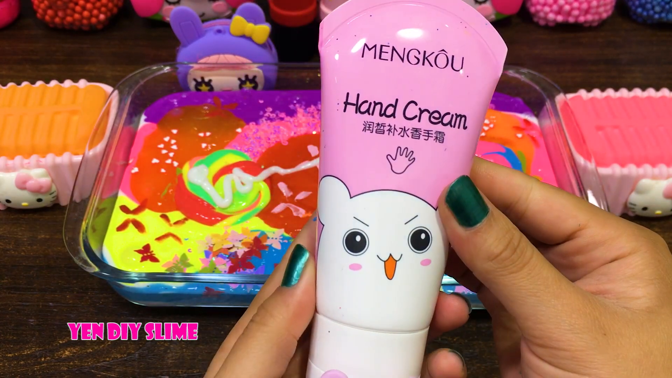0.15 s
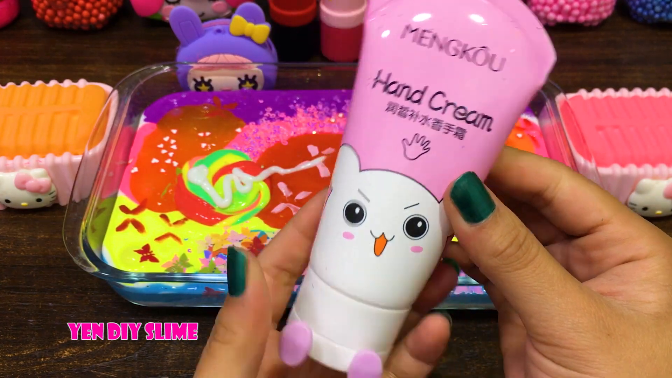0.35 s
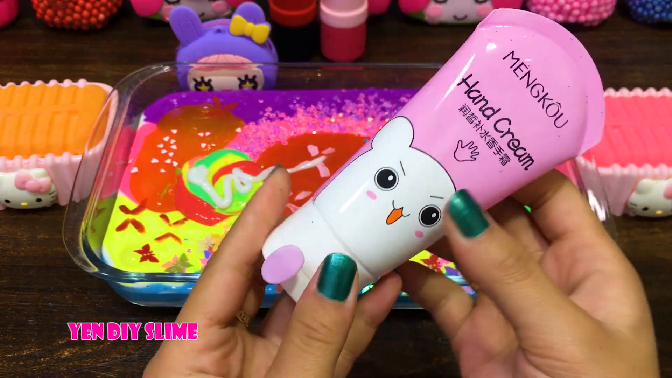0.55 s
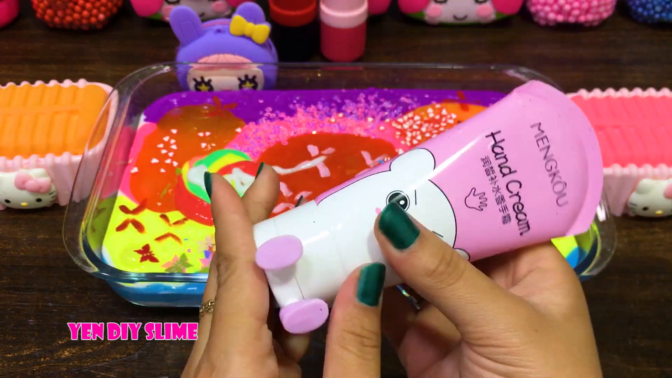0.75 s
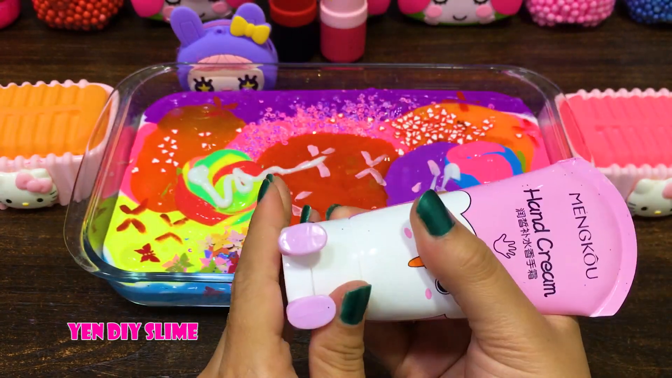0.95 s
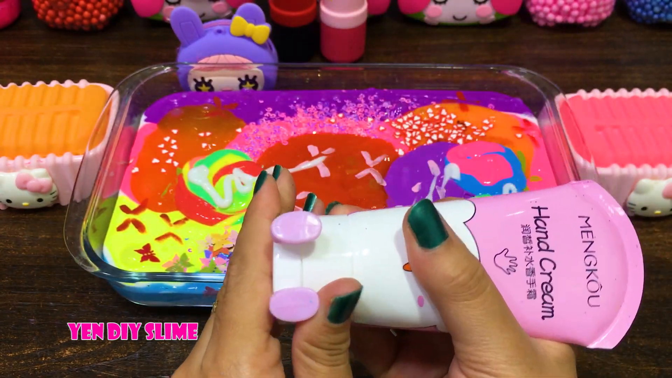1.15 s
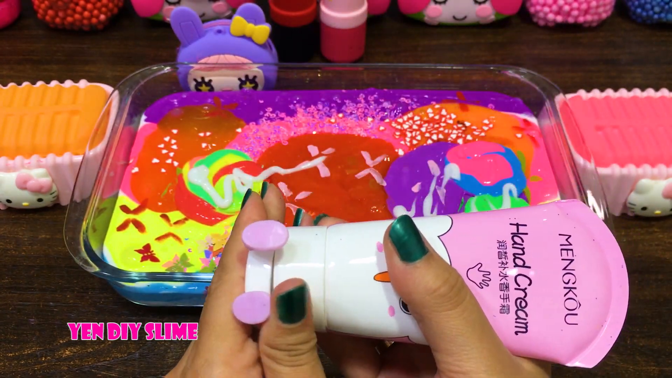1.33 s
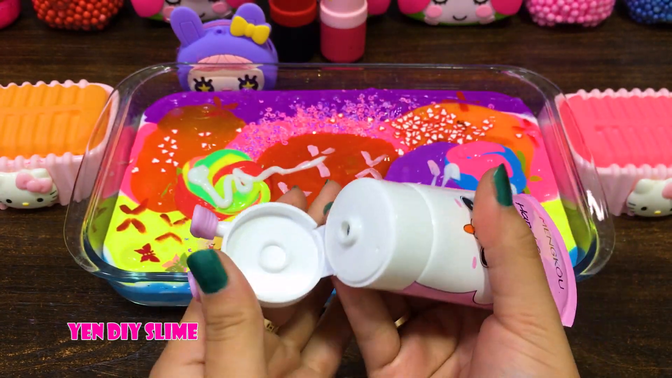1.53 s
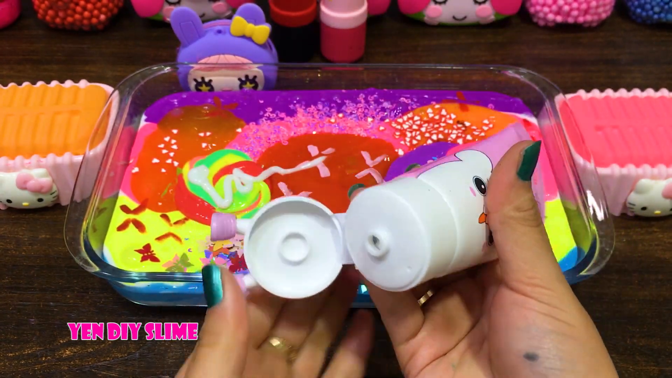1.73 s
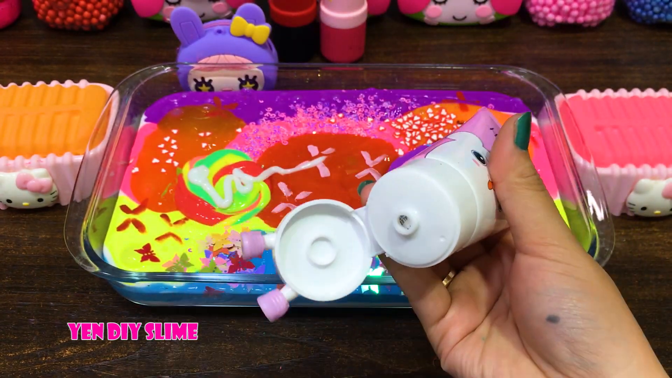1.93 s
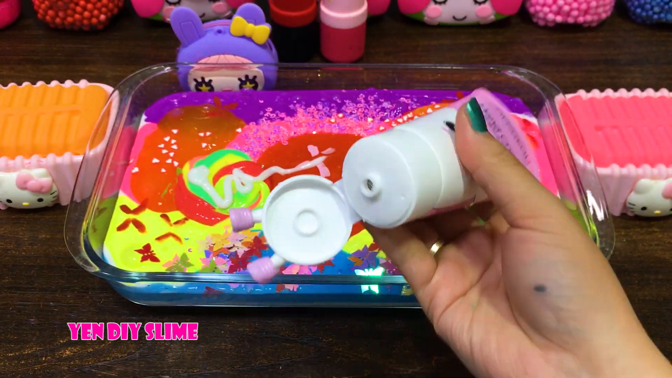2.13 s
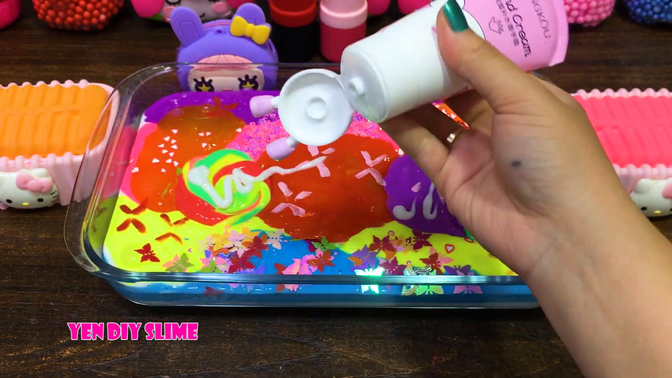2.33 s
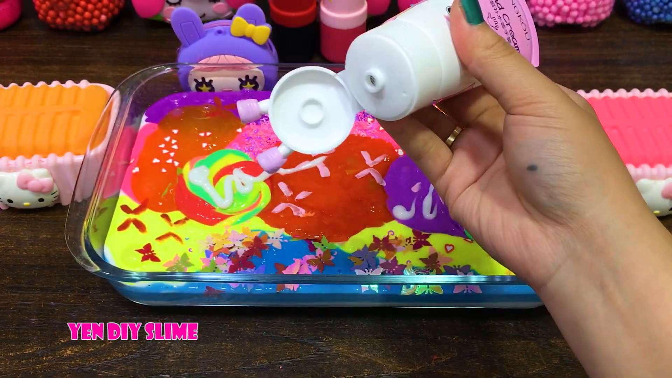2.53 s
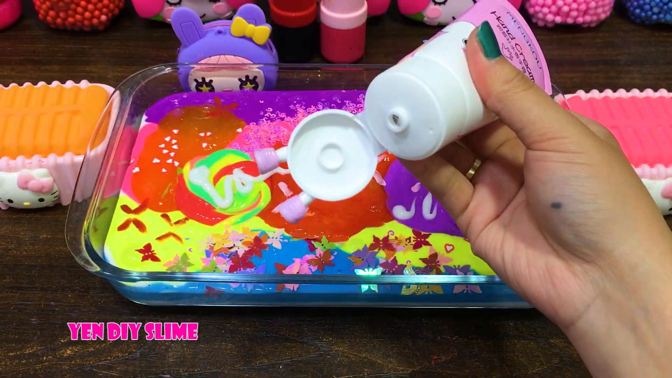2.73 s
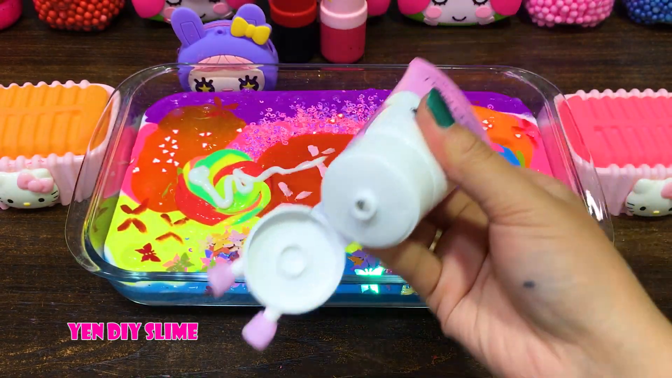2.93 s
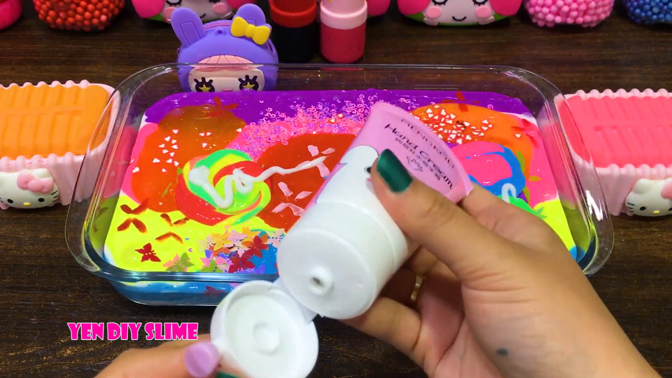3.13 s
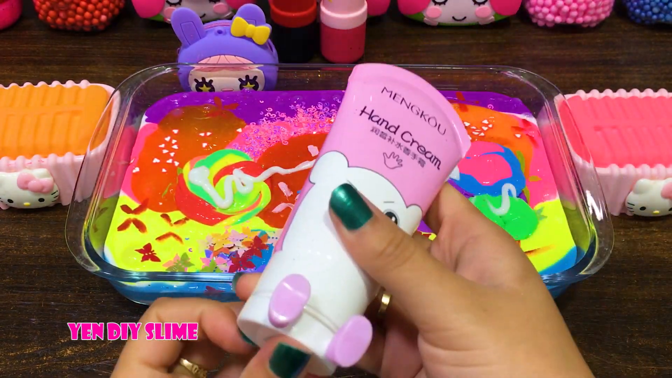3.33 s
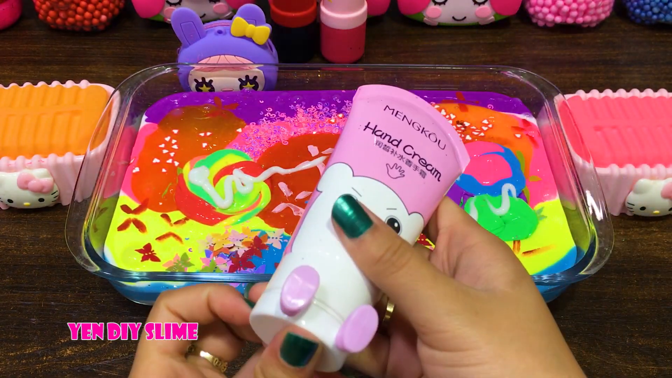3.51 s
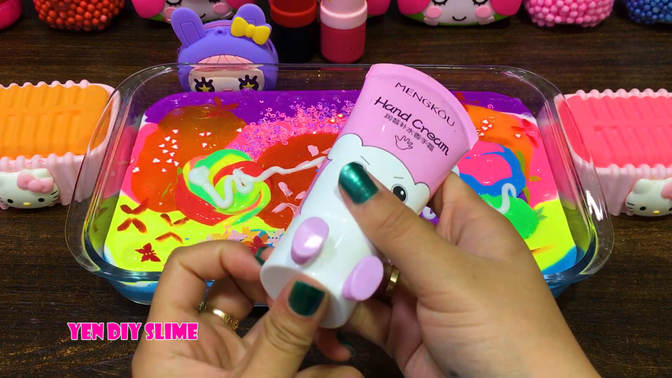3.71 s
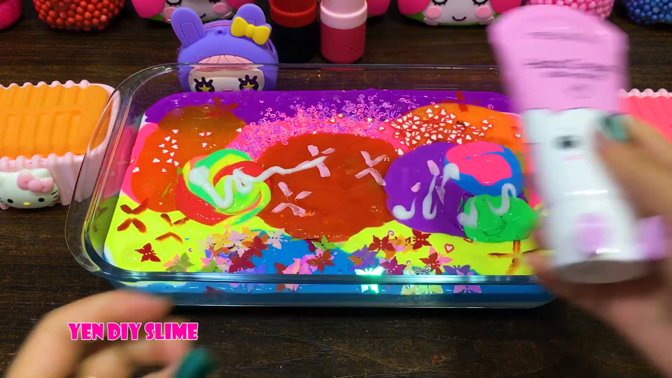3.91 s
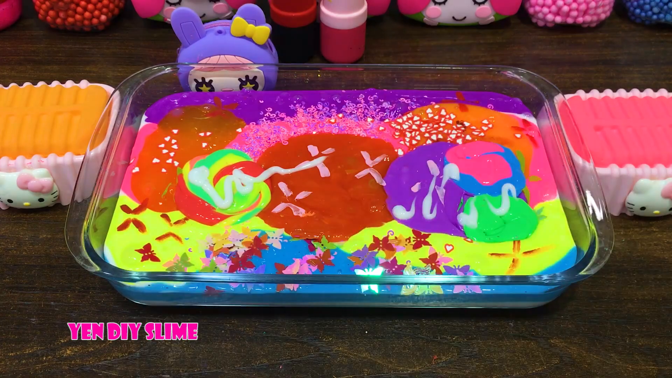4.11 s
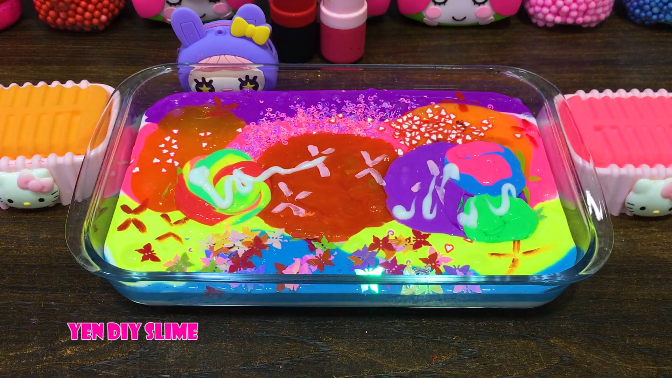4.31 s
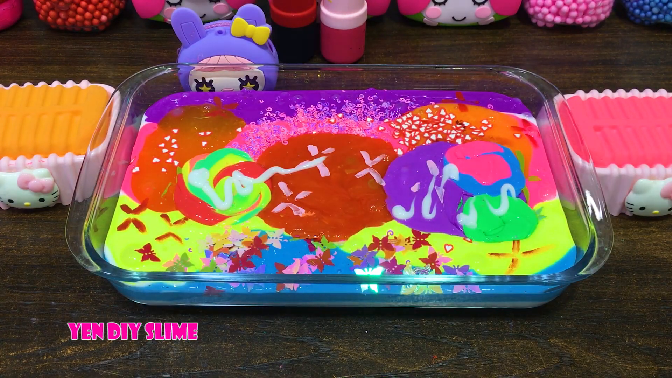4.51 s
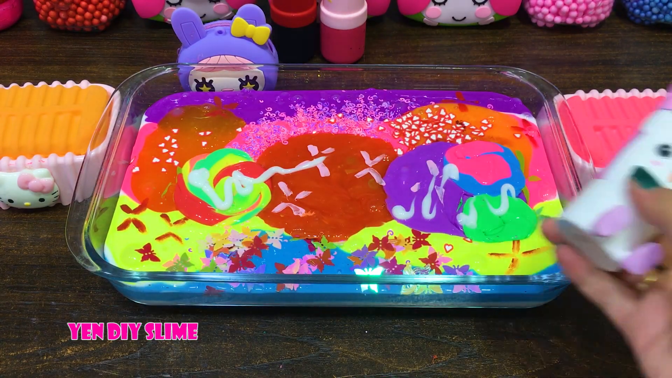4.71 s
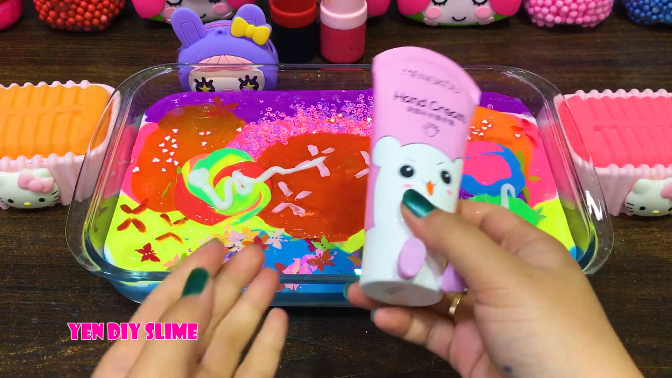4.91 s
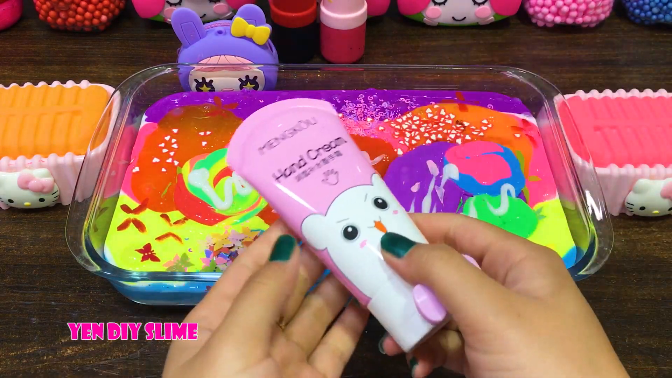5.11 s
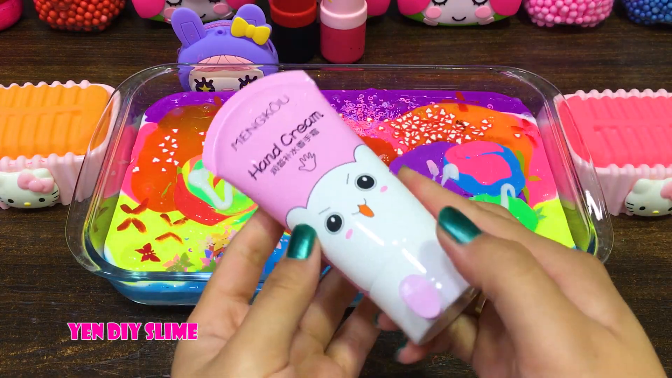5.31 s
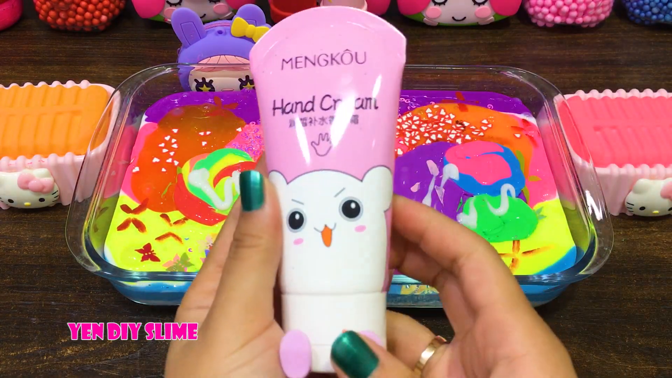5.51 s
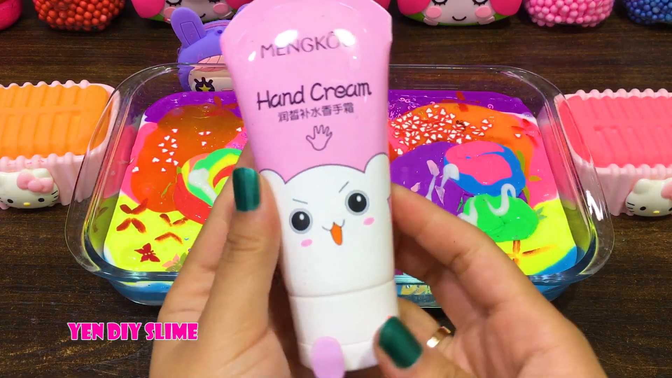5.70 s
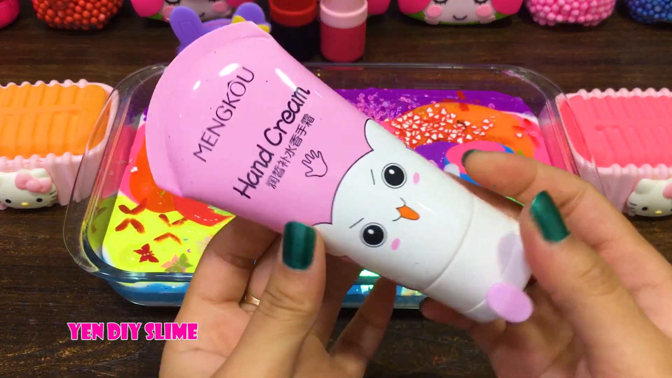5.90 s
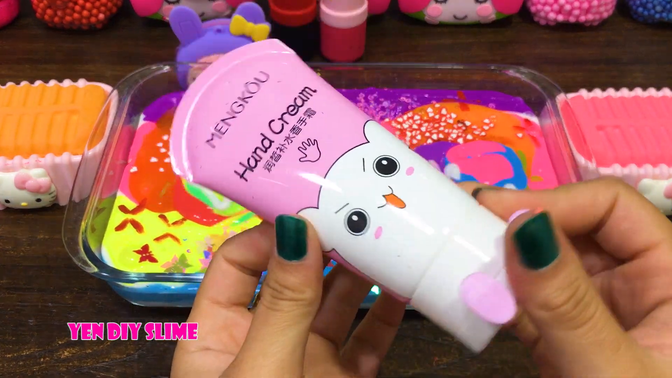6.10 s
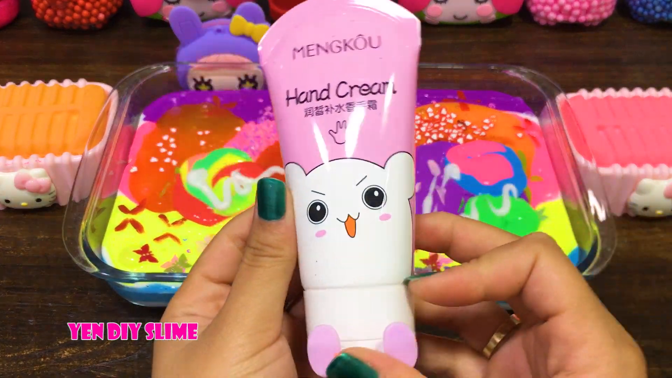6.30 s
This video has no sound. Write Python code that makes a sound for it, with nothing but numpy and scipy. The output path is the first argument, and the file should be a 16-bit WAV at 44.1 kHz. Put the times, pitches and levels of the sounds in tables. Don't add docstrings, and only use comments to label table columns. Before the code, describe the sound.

Very close to the microphone, fingers softly rub and tap a small hollow plastic tube. A nail pries the flip cap, which pops open, and its hinge creaks in a quick crackle. After a quieter stretch the cap touches down, strains and latches with a sharp snap, then clicks fully shut. Light rubs and ticks continue over faint hiss and low hum in a small damped room.

```python
import sys
import numpy as np
from scipy import signal
from scipy.fft import rfft, irfft
from scipy.io import wavfile

SR = 44100
rng = np.random.default_rng(int(sys.argv[2]) if len(sys.argv) > 2 else 0)


def output_pcm(signal):
    pcm = np.clip(np.atleast_2d(signal).T, -1, 1) * 32767
    wavfile.write(sys.argv[1], SR, np.round(pcm).astype(np.int16))


def invert_db(x):
    u = np.asarray(x, float) / 20
    return 10 ** u


N = 280035

# f/Hz, density/dB
RUMBLE_SPECTRUM = [(15, -45), (25, -15), (38, -3), (59, 5), (167, -1.5), (310, -4), (546, -14),
                   (1310, -26.5), (1500, -30), (1950, -48), (3300, -120)]
# t/s, level/dB
RUMBLE_LEVEL = [(0.0, -72), (1.48, -73), (1.73, -70), (2.05, -73.5), (4.86, -70.5), (5.48, -72.5),
                (6.01, -70), (6.35, -72.5)]
# f/Hz, density/dB
HISS_SPECTRUM = [(300, 6.5), (1000, 1.5), (2500, 0), (3700, -4.5), (5000, -2), (6400, -5.5), (8000, -2),
                 (10000, -6.5), (12000, -4), (13500, -9.5), (15000, -4.5), (16400, -10.5)]
# f/Hz, width/Hz
ROOM_MODES = [(79, 12.2), (137, 3.3)]
ROOM_MODE_LEVELS = [-79.5, -82]
# t/s, length/s, level/dB, f/Hz
HUMS = [
    (0.05, .42, -69, 55),
    (0.88, .52, -70, 55),
    (4.15, .3, -73, 82),
    (4.7, .65, -69, 80),
    (4.65, .6, -75, 137),
    (5.5, .24, -57, 76),
    (5.7, .8, -63.5, 80),
    (5.47, 1.0, -65.5, 137),
    (5.6, .7, -77, 190),
]
# f/Hz, T60/s
ROOM_T60 = [(150, .22), (500, .2), (1500, .2), (5000, .225), (8000, .19), (12000, .15), (16000, .11)]
# f/Hz, level/dB
ROOM_SPECTRUM = [(150, 3.5), (500, 0), (1500, -3), (4000, -4.5), (8000, -4.5), (12000, -2.5), (16000, -6)]
# t/s, peak/dB, f/Hz
THUMPS = [(1.545, -39, 116), (1.548, -35, 335), (3.224, -37, 250), (3.239, -49, 89.34), (3.265, -50.5, 198),
          (3.851, -41, 151.6), (5.56, -59, 76), (0.26, -51, 216), (0.745, -56, 292), (0.773, -52.5, 295),
          (1.0, -53.5, 220), (1.552, -25.5, 950), (3.272, -48, 300), (3.451, -37, 260),
          (3.8525, -28.5, 270)]
# peak t/s, length/s, level/dB, spectral centre/octaves above 1 kHz
STROKES = [(0.06, .12, -78, 2.3), (0.588, 0.055, -71, 3.1), (0.91, 0.18, -65, 2.7),
           (0.942, 0.049, -62.5, 0.86), (1.014, 0.066, -62, 0.89), (1.048, 0.18, -60.5, 2.85),
           (1.29, 0.023, -64, 2.1), (1.908, 0.058, -64, 0.41), (2.04, 0.58, -68.5, 1.03),
           (2.433, 0.45, -69, 1.3), (2.995, 0.031, -61.5, 2.8), (3.166, 0.11, -66, 3.2),
           (3.404, 0.055, -70, 1.2), (4.068, 0.11, -64.5, 2.9), (4.173, 0.21, -65.5, 0.93),
           (4.274, 0.12, -62, 2.2), (5.198, .18, -66, 0.93), (5.34, .08, -75, 2.2), (5.431, .12, -67, 1.5),
           (6.027, .14, -71, 0.65)]
# t/s, peak/dB, f/Hz
TICKS = [(0.055, -50.5, 930), (0.26, -54, 1100), (0.671, -45.5, 1130), (0.708, -45.5, 950),
         (0.931, -48.5, 1230), (1.0, -46, 1230), (2.379, -53, 1420), (3.104, -50.5, 1280),
         (4.547, -54.5, 2260), (4.865, -50.5, 2330), (4.999, -54, 2650), (5.177, -51, 2115),
         (5.963, -46.5, 1100), (5.9625, -52.5, 5000), (6.014, -54, 1711), (0.625, -48, 7850),
         (0.771, -49, 8900), (1.493, -55, 5500), (0.772, -49, 1040), (0.879, -53, 5660), (1.054, -38, 7000),
         (4.014, -48.5, 11700), (4.269, -55, 4790), (4.646, -55, 5790), (4.659, -54.5, 12350),
         (4.825, -52, 9140), (5.14, -57, 5130), (5.218, -54, 11900), (5.319, -59.5, 5450),
         (5.418, -54.5, 8350)]
# t/s, level/dB
HINGE_DRAG = [(1.709, -66), (1.735, -59), (1.758, -59), (1.764, -75), (1.80, -61), (1.83, -65), (1.86, -72)]
# t/s, slips/count, first gap/ms, gap growth/ratio, peak/dB
HINGE_RUNS = [
    (1.6665, 2, 5.3, 1, -53),
    (1.7111, 1, 5, 1, -37),
    (1.7174, 10, 4.0, 1.025, -47),
    (1.7659, 1, 5, 1, -42),
    (1.7746, 5, 5.2, 1, -39),
    (1.8021, 5, 8.7, 1.17, -39),
    (1.8905, 3, 4.5, 1.3, -53),
]
# t/s, peak/dB
LATCH_SLIPS = [(3.3764, -43), (3.4201, -47), (3.428, -43), (3.4309, -50), (3.4354, -49), (3.4459, -35)]
# start t/s, end t/s, level/dB, f/Hz, width/Hz
SQUEAK = (3.4, 3.446, -60, 5100, 400)

# f/Hz, width/Hz, level/dB
MODES_PRIED = [(350, 210, -12.5), (750, 120, -10), (1320, 190, -6), (2900, 230, -7.5), (8800, 2000, -13),
               (2030, 280, -7.0), (3600, 220, -5.0), (4210, 570, -7.5), (5060, 630, 2.5), (6800, 610, -2.0),
               (9500, 1300, -13), (11900, 580, -12), (13700, 540, -8.5), (15900, 510, -5.0)]
MODES_POPPING = [(800, 1300, -12.0), (2030, 280, -15.0), (7200, 400, -28.0), (356, 240, 7), (1360, 120, -4),
                 (2880, 1200, -1.5), (3570, 420, 3), (4790, 1230, 9.5), (6220, 700, -0.5), (8550, 630, 2.5),
                 (10840, 480, -5.0), (12320, 800, -7.5), (14300, 260, -45)]
MODES_HINGE = [(606, 870, -2.5), (950, 340, -9), (1287, 160, -2), (2260, 320, -6.5), (2770, 350, -1.5),
               (3710, 600, -18), (4540, 600, -7), (5680, 480, -1.5), (7033, 1800, -10.5), (9630, 700, -9.5),
               (11170, 1300, -20.5), (13990, 1400, -25)]
MODES_MEETING = [(290, 460, -11), (1227.6, 394, -11.5), (2140, 556, -8.5), (4305, 770, -4), (5480, 730, -1),
                 (7200, 690, -4.5), (8610, 560, -8), (9556, 680, -9), (10980, 474, -4.5),
                 (12380, 650, -20.5), (15170, 1040, -7)]
MODES_LATCHING = [(260, 150, -22), (420, 290, -21.5), (741.3, 350, -27), (5190, 160, -12.0),
                  (12800, 603, -15.5), (1200, 232.6, -7.5), (2660, 1000, -12.0), (4320, 274, -2),
                  (5610, 590, -2), (7800, 630, -11.5), (9170, 395, -13.5), (10680, 602.5, -11.0),
                  (11900, 1230, -13.0), (14870, 290, -33.5)]
MODES_SEALED = [(250, 200, -11.5), (610, 190, -20.5), (1110.0, 650, -12.0), (5750, 170, -21.0),
                (12850, 2400, -29), (1715, 450, -3.5), (3050, 250, -8), (4300, 660, -18.5),
                (5000, 410, -31.0), (6640, 240, -23.5), (7100, 346, -23.5), (8240, 380, -16.0),
                (10000, 338, -25.5), (11270, 700, -28.0), (14900, 2500, -24.5)]

# t/s, peak/dB, contact length/ms
PRY = [
    (1.1637, -29, .4),
    (1.1642, -24, .5),
    (1.1649, -25, .5),
    (1.1655, -26, .3),
]
POP = [
    (1.5441, -38, 1.5),
    (1.5472, -34, 1.2),
    (1.5479, -10, 1.2),
    (1.5505, -26.5, 0.4),
]
MEET = [
    (3.221, -40, 0.36),
    (3.2218, -24, 0.42),
    (3.2373, -15.5, 0.53),
    (3.238, -22, 0.42),
    (3.2658, -17, 0.13),
    (3.2697, -20, 0.55),
]
LATCH = [
    (3.4489, 1.5, 0.28),
    (3.4582, -6, 0.17),
]
SEAL_EDGE = [
    (3.8498, -4.5, 0.4),
]
SEAL = [
    (3.8335, -50, 0.51),
    (3.85, -16, 0.68),
    (3.8506, -0.5, 1),
    (3.8512, -5, 0.69),
]


def rms_one(x):
    return x / np.sqrt(np.mean(x ** 2) + 1e-20)


def in_time(rows, outside=None):
    s, *columns = np.transpose(rows)
    return [np.interp(np.arange(N) / SR, s, column, outside, outside) for column in columns]


def at_hz(points, hz):
    points_hz, values = np.transpose(points)
    return np.interp(np.log(hz), np.log(points_hz), values)


def resonance(x, hz, width_hz):
    r = np.exp(-np.pi * width_hz / SR)
    zeros = np.array([1, 0, -1]) * (1 - r * r) / 2
    poles = [1, -2 * r * np.cos(2 * np.pi * hz / SR), r * r]
    return signal.lfilter(zeros, poles, x)


def coloured(points):
    hz = np.maximum(np.fft.rfftfreq(N, 1 / SR), 1)
    spectrum = rfft(rng.standard_normal(N)) * invert_db(at_hz(points, hz))
    return rms_one(irfft(spectrum, N))


def add(out, s, sound):
    i = round(s * SR)
    out[i:i + len(sound)] += sound[:N - i]


def drift(rate_hz):
    r = np.exp(-80 * np.pi * rate_hz / SR)
    noise = rng.standard_normal(N // 40 + 2002)
    slow = signal.lfilter([1], [1, -2 * r, r * r], noise)[2000:]
    return np.interp(np.arange(N) / 40, np.arange(len(slow)), rms_one(slow))


def hums():
    attack_s, release_s, flutter_db, wobble_hz = .05, .1, 1.5, 1.2
    out, t = np.zeros(N), np.arange(N) / SR
    for s, length_s, db, hz in HUMS:
        rise, fall = (t - s) / attack_s, (s + length_s - t) / release_s
        shape = np.clip(np.minimum(rise, fall), 0, 1)
        turns = np.cumsum(hz + wobble_hz * drift(6.5)) / SR
        level = invert_db(db + flutter_db * drift(15.0))
        out += shape * level * np.sqrt(2) * np.sin(2 * np.pi * turns)
    return out


def background():
    hiss_db, sway_db, sway_hz = -69, -0.5, 2.5
    rumble_db = in_time(RUMBLE_LEVEL)[0] + 5.0 + sway_db * drift(sway_hz)
    out = invert_db(rumble_db) * coloured(RUMBLE_SPECTRUM)
    out += invert_db(hiss_db) * coloured([(100, -42.5)] + HISS_SPECTRUM)
    for (hz, width_hz), db in zip(ROOM_MODES, ROOM_MODE_LEVELS):
        mode = resonance(rng.standard_normal(N), hz, width_hz)
        out += invert_db(db) * rms_one(resonance(mode, hz, 2 * width_hz))
    return out + hums()


def room(x):
    first_echo_s = 0.0012
    t, tail = np.arange(SR // 2) / SR, 0
    for hz in 90 * 2 ** np.arange(0, 7.6, .5):
        band_filter = signal.butter(2, [hz / 1.19, hz * 1.19], "band", fs=SR, output="sos")
        band = signal.sosfilt(band_filter, rng.standard_normal(len(t)))
        tail = tail + band * invert_db(at_hz(ROOM_SPECTRUM, hz) - 60 * t / at_hz(ROOM_T60, hz))
    tail = tail * (1 - np.exp(-(t / first_echo_s) ** 2))
    return signal.fftconvolve(x, tail / np.sqrt(np.sum(tail ** 2)))[:N]


def thumps():
    out, click = np.zeros(N), np.eye(1, 8000)[0]
    for s, db, hz in THUMPS:
        push = resonance(resonance(click, hz, 0.24 * hz), hz, 6.3 * hz)
        add(out, s, invert_db(db) * push / np.abs(push).max())
    return out


def rubbing():
    rise_share, edge_loss_db, grains_per_s = 0.9, 15.5, 6000
    grain_db = 3.085 * np.minimum(rng.exponential(1, N), 3)
    grains = rng.standard_normal(N) * invert_db(grain_db) * (rng.random(N) < grains_per_s / SR)
    bands = []
    for octave in np.linspace(0, 3.7, num=9):
        hz = 1000 * 2 ** octave
        band = resonance(resonance(grains, hz, 0.45 * hz), hz, 0.6 * hz)
        bands.append((octave, rms_one(band)))
    out = np.zeros(N)
    for s, length_s, db, centre in STROKES:
        start = s - rise_share * length_s
        edge_db = db - edge_loss_db
        level_db, = in_time([(start, edge_db), (s, db), (start + length_s, edge_db)], outside=-200)
        rub = sum(invert_db(-2.5 - 10 * (octave - centre) ** 2) * band for octave, band in bands)
        out += invert_db(level_db) * rub
    return out


def contact(length_ms, rough):
    t = np.arange(1000) / SR
    fade = np.exp(-1000 * t / max(length_ms, .05))
    slips = rough * rng.standard_normal(len(t)) * fade
    slips[0] = 1
    return slips


def ticks():
    out = np.zeros(N)
    for s, db, hz in TICKS:
        push = contact(2.5, rough=1.5)
        ring = resonance(resonance(push, hz, 0.46 * hz), hz, 1.9 * hz)
        tap = ring + invert_db(-11) * resonance(push, 3000, 6300)
        add(out, s, invert_db(db - 1.3) * tap / np.abs(tap).max())
    return out


def hinge_drag():
    chatter = rng.standard_normal(N) * (rng.random(N) < 2500 / SR)
    body = 0
    for k, (hz, width_hz, db) in enumerate(MODES_HINGE):
        body = body + (-1) ** k * invert_db(db) * resonance(chatter, hz, width_hz)
    return invert_db(in_time(HINGE_DRAG, outside=-120)[0] - 1.5) * rms_one(body)


def squeak():
    start, end, db, hz, width_hz = SQUEAK
    slips = rng.standard_normal(N) * (rng.random(N) < 1500 / SR)
    tone = resonance(resonance(slips, hz, width_hz), hz, width_hz)
    level_db, = in_time([(start, db - 8), (end, db)], outside=-120)
    return invert_db(level_db) * rms_one(tone)


def hinge_slips():
    gap_jitter, weak_slip_db, loss_db_per_doubling = .04, -45, 13
    rows = []
    for s, count, gap_ms, growth, db in HINGE_RUNS:
        for k in range(count):
            uneven_db = 2.5 * rng.standard_normal() if db < weak_slip_db else 0
            slowing_db = loss_db_per_doubling * k * np.log2(growth) * (k > 1)
            rows.append((s, db - slowing_db + uneven_db))
            s += gap_ms / 1000 * growth ** k * (1 + gap_jitter * rng.standard_normal())
    return rows


def strikes(rows, modes, scatter_db, rough, length_ms=None, gain_db=0):
    out = np.zeros((2, N))
    for row in rows:
        push = contact(length_ms or row[2], rough)
        shift = rng.standard_normal(len(modes))
        ring, power = 0, 0
        for k, (hz, width_hz, db) in enumerate(modes):
            swell = resonance(push, hz, 2.2 * width_hz)
            gain = (-1) ** k * invert_db(db + scatter_db * shift[k]) * np.sqrt(width_hz)
            ring = ring + gain * rms_one(resonance(swell, hz, width_hz))
            wide = rms_one(resonance(contact(1, rough=0), hz, 1.1 * width_hz + .04 * hz))
            power = power + np.abs(gain * rfft(wide)) ** 2
        phase = np.angle(rfft(contact(2.0, rough=3.0)))
        blur = np.roll(irfft(np.sqrt(power) * np.exp(1j * phase)), 45)
        ring = invert_db(row[1] + gain_db) * ring / np.abs(ring).max()
        add(out[0], row[0], ring)
        add(out[1], row[0] + rng.uniform(0, .002), rms_one(blur) * np.sqrt(np.mean(ring ** 2)))
    return out


def cap():
    out = strikes(PRY, MODES_PRIED, 0.91, rough=0.9)
    out += strikes(POP, MODES_POPPING, 1.2, rough=0.31)
    out += strikes(hinge_slips(), MODES_HINGE, 4.1, rough=0.11, length_ms=1.0, gain_db=2.5)
    out += strikes(MEET, MODES_MEETING, 2.144, rough=0.3)
    latch_slips = LATCH_SLIPS + [(3.4105, -50), (3.4252, -44)]
    out += strikes(latch_slips, MODES_HINGE[5:10], 2.494, rough=0.312, length_ms=.6, gain_db=-0.6)
    out += strikes(LATCH, MODES_LATCHING, 1.0, rough=0.1)
    out += strikes(SEAL_EDGE, MODES_MEETING[2:], 1.511, rough=0.065)
    out += strikes(SEAL, MODES_SEALED, 0.65, rough=.15)
    return out


def scene():
    room_db = -16.5
    floor = background()
    direct, around = cap()
    handling = thumps() + hinge_drag() + squeak() + ticks() + rubbing()
    return (direct + handling + invert_db(room_db) * room(around + handling) + floor)[None]


def roll_off(x):
    return signal.sosfilt(signal.butter(12, 16530, fs=SR, output="sos"), x)


def record(dry):
    clipped = np.clip(dry, -.94, .94)
    lean = signal.sosfilt(signal.butter(3, 44, "high", fs=SR, output="sos"), clipped)
    mix = signal.sosfilt(signal.cheby2(10, 50, 16600, fs=SR, output="sos"), lean)
    return roll_off(mix)


dry = scene()
out = record(dry)
output_pcm(out)
```